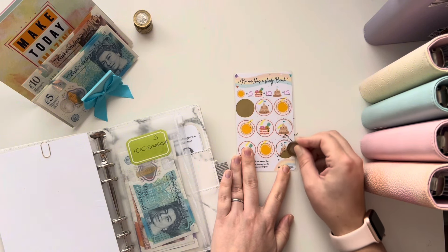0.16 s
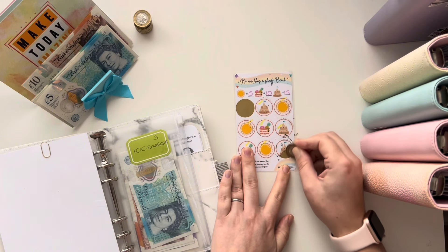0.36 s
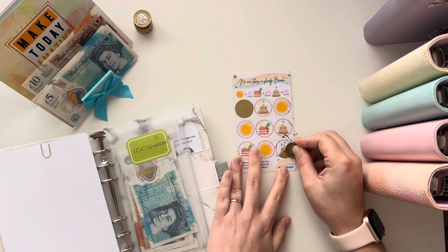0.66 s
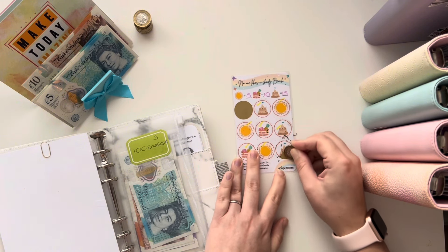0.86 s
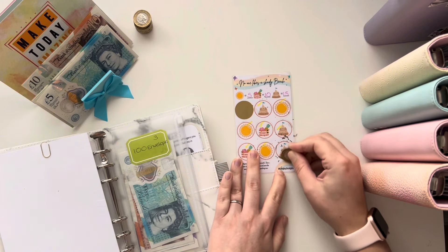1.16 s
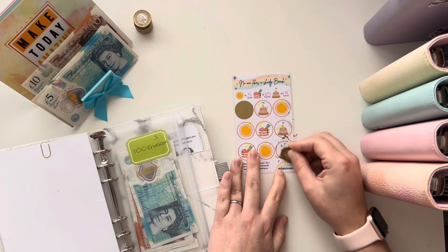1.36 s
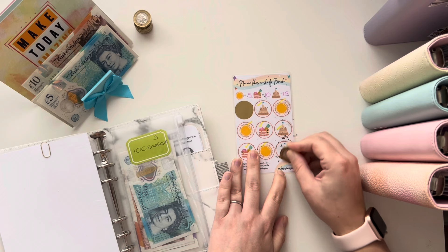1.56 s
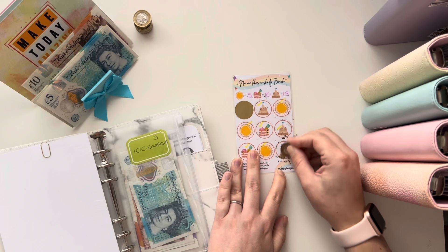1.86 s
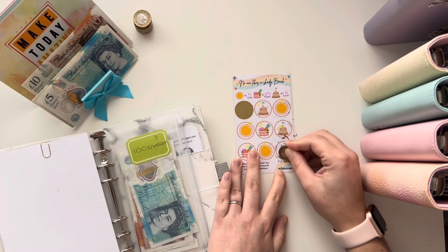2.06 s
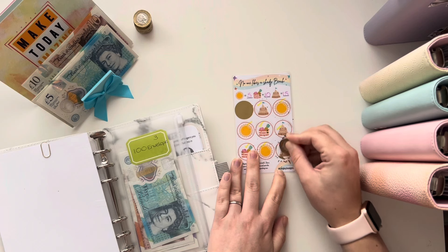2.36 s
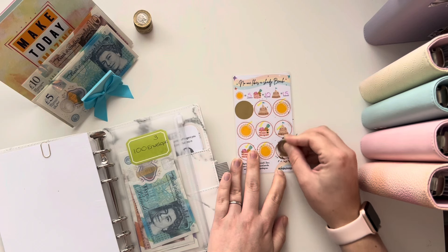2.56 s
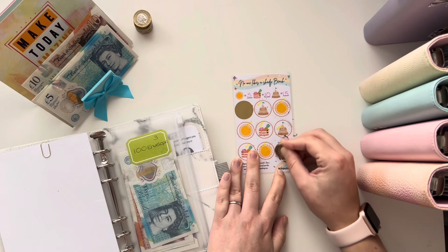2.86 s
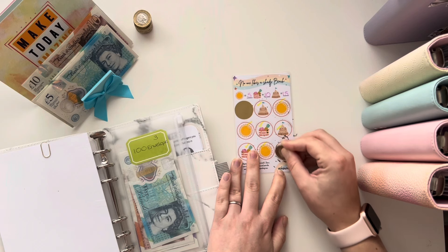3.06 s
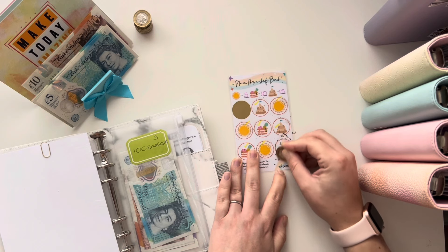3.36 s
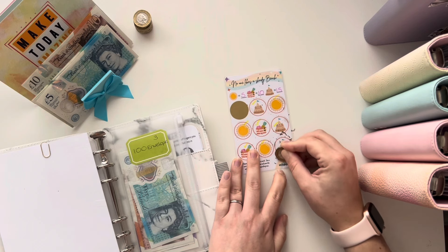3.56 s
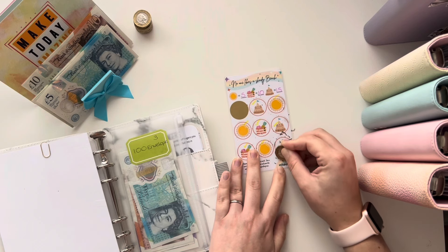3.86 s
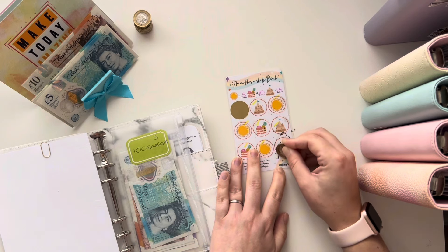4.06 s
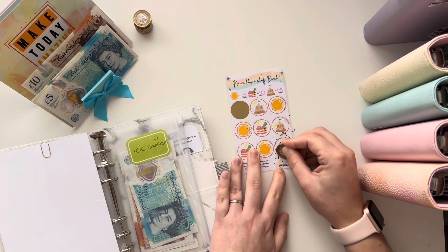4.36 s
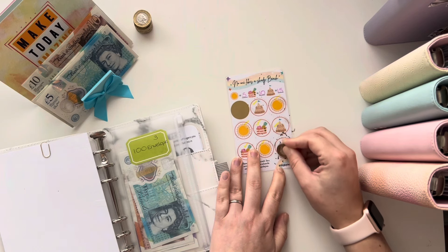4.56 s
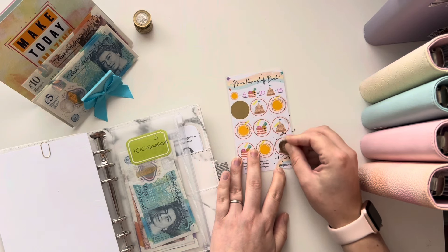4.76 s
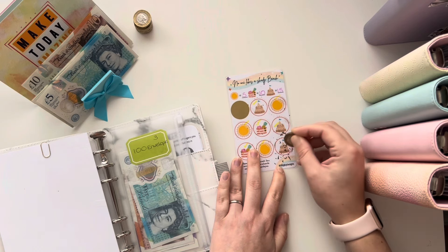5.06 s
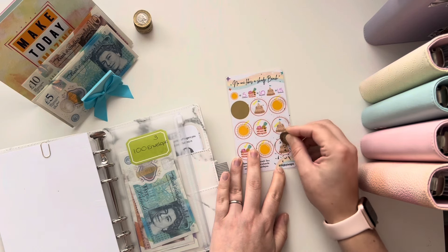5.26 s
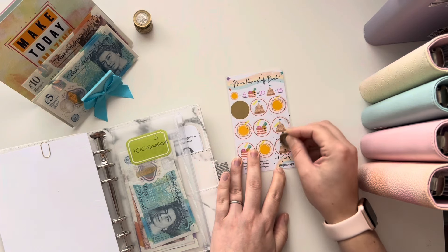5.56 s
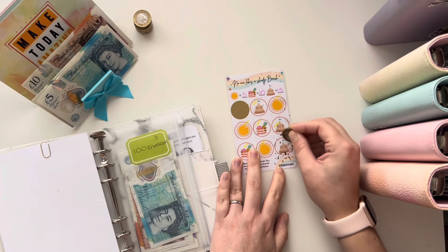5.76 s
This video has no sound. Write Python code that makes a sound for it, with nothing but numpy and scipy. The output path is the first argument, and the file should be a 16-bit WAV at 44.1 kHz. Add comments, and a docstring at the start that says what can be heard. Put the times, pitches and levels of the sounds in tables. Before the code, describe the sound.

A coin edge scratches a coated card on a hollow desk in quick, dry rubbing strokes, then uneven scrapes and two hard taps.

```python
"""A coin is rubbed in quick strokes over a coated paper card on a hollow desk, heard close by at two ports.
Modulated noise drives the desk modes and the grit; tap pulses and clicks mark each contact of the edge.
The strokes run dense for some three seconds, then grow uneven; near 3.7 s a wavering sine squeaks faintly.
After a lull near 5 s the two hardest taps end the scene.
Jolts and rumble ring slow modes; a small quiet room answers with decaying noise, over a steady hush."""
import sys
import numpy as np
from scipy import signal
from scipy.fft import rfft, irfft, next_fast_len
from scipy.io import wavfile
from scipy.ndimage import uniform_filter1d, map_coordinates

SR = 44100
rng = np.random.default_rng(int(sys.argv[2]) if len(sys.argv) > 2 else 0)


def ratio_of_db(decibels):
    """Turn decibels (scalar or array-like) into linear amplitude factors; 0 dB maps to 1."""
    return 10 ** (np.asarray(decibels, float) / 20)


def persist_wave(psi):
    """Save psi, clipped to +-1, as 16-bit WAV."""
    counts = np.round(np.clip(psi, -1, 1) * 32767).astype(np.int16)
    wavfile.write(sys.argv[1], SR, np.atleast_2d(counts).T)


N = 260983
SIDE = np.array([[.5], [-.5]])  # left, right share of a difference between the ports

# airborne sound reaches the two ports apart: (frequency [Hz], left lead [rad])
LEAD = [(2500, .8), (4000, 0), (6100, -.9), (7600, 0), (9500, -3.14), (11600, -6.28), (13400, -9.42),
        (15300, -12.57), (17000, -15)]
# tilt of the coin and shift of the hand:
# (time [s], top treble gain [dB], rim gain [dB], lowest desk mode gain [dB])
EDGE = [(0, -36, 10.5, -8), (.6, 9, 3, 0.5), (1, -9, 4.5, -6.5), (1.7, -4.5, 6, -0.5), (2.4, 3.5, 5.5, -5),
        (2.95, -3.5, -31, 3), (3.1, -7.5, -34, -2.5), (4.101, -1.5, -29.5, -0.5), (4.602, -8, -48.5, 2),
        (5.101, 12.5, 1, 3.5), (5.9, -1.5, 4.5, -36)]


def unit(x):
    """Scaled to rms 1."""
    return x / np.sqrt(np.mean(x ** 2) + 1e-20)


def along(points, hz):
    """(Hz, value) points interpolated on a log frequency axis."""
    f, v = np.transpose(points)
    return np.interp(np.log(hz + 1), np.log(f + 1), v)


def filtered(x, response):
    """x times a complex response of frequency."""
    m = next_fast_len(N + SR // 2)
    return irfft(rfft(x, m) * response(np.fft.rfftfreq(m, 1 / SR)), m)[..., :N]


def mode(f, hz, width_hz):
    """One causal resonance, gain 1 at its centre."""
    return 1j * f * width_hz / (hz * hz - f * f + 1j * f * width_hz)


def wobble(knots_per_s):
    """A smooth random curve."""
    knots = rng.standard_normal(int(N * knots_per_s / SR) + 4)
    return map_coordinates(knots, [np.arange(N) * knots_per_s / SR])


def patches(x, depth_db):
    """The colour of a noise drifts in random patches of frequency and time."""
    z = signal.stft(x, nperseg=256)[2]
    field = uniform_filter1d(rng.standard_normal(z.shape), size=5, axis=0)
    field = uniform_filter1d(field, size=14, axis=1)
    return signal.istft(z * ratio_of_db(depth_db * unit(field)), nperseg=256)[1][:N]


def strokes():
    """Force swells and fades through each stroke; the edge slips unevenly over the coating."""
    # (middle [s], half length [s], desk level [dB], grit over desk [dB], weight over desk [dB])
    rubs = [(0.039, 0.026, -47, -21.5, 0), (0.16, 0.033, -47.5, -24.5, 6), (0.248, 0.015, -55.5, -9.5, 5),
            (0.347, 0.026, -43.5, -19, 1.5), (0.444, .015, -44, -22, -4.5), (0.522, 0.025, -52.5, -26, 5),
            (0.646, 0.043, -63.5, -8.5, -2), (0.704, 0.044, -68.5, -14, 5), (0.82, .018, -47.5, -21, 6),
            (0.944, 0.02, -41, -18.5, -1.5), (1.079, 0.034, -45, -16, 8.5), (1.17, 0.0076, -39, -16, -3),
            (1.205, 0.018, -42.5, -14.5, -35), (1.309, 0.036, -46, -13, 8), (1.419, 0.022, -39, -13, -6),
            (1.531, 0.03, -44, -13, 4), (1.644, 0.023, -45.5, -11, -5), (1.745, 0.03, -42.5, -18, 5),
            (1.873, 0.021, -42, -14.5, -3.5), (1.982, 0.032, -45.5, -16, 5),
            (2.099, 0.022, -42.5, -14.5, -3), (2.22, 0.026, -43.5, -20, 4), (2.33, 0.016, -47.5, -17, 8),
            (2.425, 0.026, -42.5, -16.5, 1), (2.529, 0.028, -58, -12.5, 2), (2.614, 0.017, -62.5, -16, 12),
            (2.642, 0.013, -45, -10, 9), (2.743, 0.021, -51, -8.5, -18), (2.85, 0.041, -65.5, -2.5, 17.5),
            (2.949, 0.016, -52.5, -10.5, 3.5), (3.075, 0.031, -57, -8.5, 5.5),
            (3.149, 0.012, -43.5, -18.5, -30), (3.27, 0.033, -63, -11, 5), (3.369, 0.019, -46, -13.5, -7),
            (3.497, 0.021, -62, -10.5, 10), (3.595, 0.026, -67.5, -2, 0), (3.768, 0.086, -77.5, -17, 1),
            (3.901, 0.015, -68, -19.5, -10.5), (3.937, 0.011, -51.5, -25, 9), (4.103, 0.034, -72, -34, 3.5),
            (4.141, 0.013, -45, -27.5, 3.5), (4.164, 0.012, -43, -16.5, -3.5),
            (4.277, 0.022, -51.5, -27, 9), (4.365, 0.046, -59, -21.5, 2.5), (4.478, 0.022, -60.5, -23.5, 9),
            (4.5, 0.014, -56.5, -24, 8), (4.557, 0.012, -45.5, -21.5, 2), (4.69, 0.053, -63, -34, 9),
            (4.749, 0.034, -61.5, -5.5, 0), (4.819, 0.041, -69, -10, 12.5), (4.933, 0.028, -81, 2.5, -4),
            (5.261, 0.024, -87, -18, 32), (5.299, 0.026, -61.5, -11, 18.5), (5.445, 0.018, -83, 6.5, -3),
            (5.526, 0.018, -44.5, -43, -1), (5.567, 0.036, -64, -6, 18.5), (5.618, 0.031, -75, -5, 15),
            (5.804, 0.021, -49.5, -24, 5), (5.85, 0.026, -54.5, -11, 14)]
    end_drop_db, rise_power, fade_power = 8.5, 2.06, 1.75  # drop half a length from the middle
    t = np.arange(N) / SR
    light, heavy, grit = np.zeros((3, N))
    for s, half_s, db, grit_db, weight_db in rubs:
        u = (t - s) / half_s
        swell = ratio_of_db(db - end_drop_db * np.abs(u) ** np.where(u < 0, rise_power, fade_power))
        light += swell
        heavy += swell * ratio_of_db(weight_db)
        grit += swell * ratio_of_db(grit_db)

    chatter = wobble(70)  # stick and slip shakes desk and grit together
    rasp = wobble(300)  # fine scrapes inside each stroke
    grains = rng.standard_normal((2, N)) * ratio_of_db(3.54 * rng.standard_normal((2, N)))
    # crumbs of coating tear off, 700 a second on average
    crumbs = (rng.random(N) < 700 / SR) * rng.standard_normal(N)
    crumbs = crumbs * ratio_of_db(1 * rng.exponential(size=N))
    grains = grains + crumbs * ratio_of_db([[17], [13]])

    slips = patches(grains[0], depth_db=2) * ratio_of_db(1.35 * chatter + 1.0 * rasp)
    fizz = patches(grains[1], depth_db=3) * ratio_of_db(2.1 * chatter + 0.26 * rasp)
    slow = filtered(slips, lambda f: 1 / (1 + (f / 900) ** 6))  # weight drives only the lower modes
    thud = desk(heavy * slow + light * (slips - slow)) / np.std(desk(slips))
    return thud + air(grit * fizz) / np.std(air(fizz))


def taps():
    """Each contact pushes the desk and springs back, with a short noise click."""
    # coin edge strikes or catches:
    # (time [s], level before drive gain [dB], click over that [dB], push and rebound [ms])
    contacts = [(0.131, -28.5, -35, 1.9), (0.614, -29, -42, 1.28), (0.692, -39, -24, 1.54),
                (0.896, -37, -55, 1.7), (0.927, -46, -33, 0.77), (1.201, -18.5, -34, 1.32),
                (1.272, -26, -55, 1.06), (1.496, -40.5, -34, 1.4), (1.553, -20.5, -46, 1.2),
                (1.611, -26, -29.5, 0.74), (1.834, -47, -13, 1.3), (2.202, -28, -53, 2),
                (2.604, -33, -52, 1.9), (2.63, -25, -38, 0.96), (2.639, -19.5, -48, 0.99),
                (2.731, -21, -34, 0.54), (2.737, -24.5, -60, 0.36), (2.863, -21.5, -39, 1.25),
                (2.942, -25.5, -38.5, 0.42), (3.066, -12, -37, 1.14), (3.143, -17.5, -49.5, 1.19),
                (3.353, -37.5, -40, 1.2), (3.363, -25, -30.5, 1.31), (3.571, -42.5, -17, 2),
                (3.599, -32.5, -42, 1.96), (3.929, -39.5, -30, 0.75), (3.941, -39.5, -43, 2),
                (4.05, -26.5, -43.5, 1.1), (4.133, -27.5, -40, 0.96), (4.166, -31.5, -26, 0.78),
                (4.414, -39, -36, 0.55), (4.303, -18.5, -42.5, 1.03), (4.487, -19.5, -40, 1.04),
                (4.545, -34, -48, 1.2), (4.665, -22, -40, 0.93), (4.712, -33.5, -51, 2.3),
                (4.721, -31.5, -23.5, 0.83), (4.763, -44.5, -13.5, 2.8), (5.215, -39, -31, 2),
                (5.277, -28.5, -32, 1.1), (5.288, -42.5, -22.5, 1.9), (5.507, -7, -42, 1.63),
                (5.553, -20.5, -22, 1.27), (5.781, -5, -42, 1.7)]
    drive_db, jar_db = 16.5, 12.5
    click_rise_s, click_t60_s, click_tail_t60_s = .0004, .005, .033
    push, click = np.zeros(N + SR), np.zeros(N + SR)
    t = np.arange(SR // 40) / SR
    for s, db, click_db, ms in contacts:
        now = slice(round(s * SR), round(s * SR) + len(t))
        u = t / (ms / 1000)
        push[now] -= ratio_of_db(db + drive_db) * np.sin(2 * np.pi * u) * np.exp(-2.5 * u)
        # the hard edge jars the higher modes
        push[now] -= ratio_of_db(db + jar_db - 60 * t / 0.0013) * np.sin(2 * np.pi * 2100 * t)
        fall = 0.84 * ratio_of_db(-60 * t / click_t60_s) + 0.5 * ratio_of_db(-60 * t / click_tail_t60_s)
        envelope = fall * (1 - np.exp(-t / click_rise_s))
        click[now] += ratio_of_db(db + click_db + drive_db) * envelope * rng.standard_normal(len(t))
    # a short tap moves the lowest mode less; the coin stays pressed down, so the modes die sooner
    return desk(push[:N], low_db=-3, damping=1.45) + air(click[:N])


def desk(force, low_db=0, damping=1):
    """The desk top rings; neighbouring modes swing in opposite senses, and the bass is not radiated."""
    # modes at each port, before hand shift and damping:
    # (frequency [Hz], width [Hz], left level [dB], right level [dB], left lead [rad])
    modes = [(406.1, 15, 6, 8.5, -0.5), (548.5, 96, -7, -1.5, 3), (617.8, 50.7, 1.5, -26.5, 1.49),
             (820.4, 100, -5.5, -4.5, -1.07), (1087, 22.2, -2.5, -2, 0.3), (1224, 38, 0, -10.5, 1.7),
             (1352, 41, -1, -2, 2), (1610, 52, -2.5, -4, 0.86), (2057, 34, -9, -10, 1.3),
             (2145, 107, -8.5, -15.5, -0.03), (2382, 250, -15.5, -27, -1.5), (3216, 82, -22, -67, 8)]
    card_hz = 4020  # the card cushions the desk above this
    shift, shifts_per_s = .018, 10  # the pressing hand detunes the modes by this share either way
    s, _, _, palm_db = np.transpose(EDGE)
    # the resting hand damps the lowest mode
    low = filtered(force, lambda f: 1 / (1 + (f / 490) ** 8))
    held = force + low * (ratio_of_db(np.interp(np.arange(N) / SR, s, palm_db) + low_db) - 1)

    def ring(x, tune):
        """The modes driven by x, all retuned by one factor."""
        def response(f):
            total = 0
            for k, (hz, width_hz, left_db, right_db, lead) in enumerate(modes):
                port = ratio_of_db([[left_db], [right_db]]) * np.exp(1j * SIDE * lead)
                total = total + (-1) ** k * port * mode(f, hz * tune, width_hz * damping) / damping
            return (f / (f - 210j)) ** 4 / (1 + 1j * f / card_hz) ** 2 * total
        return filtered(x, response)

    press = .5 + .5 * np.tanh(wobble(shifts_per_s))
    return ring(held * press, 1 + shift) + ring(held * (1 - press), 1 - shift)


def air(force):
    """The scraped coating heard straight through the air; its top and the rim follow the coin's tilt."""
    # grit of the coating: (frequency [Hz], relative spectral level [dB])
    coating = [(1200, -2), (2500, -5), (4000, -6), (5300, -13.5), (7500, -16), (10000, -13), (12500, -22),
               (15700, -11.5), (16100, -22), (16500, -80.5)]
    # coin rim, damped by the fingers: (frequency [Hz], width [Hz], level before tilt [dB])
    rim_modes = [(3950, 430, -12.5), (6130, 560, 2), (6900, 47, -3), (7310, 640, -2.5)]
    s, top_db, rim_db, _ = np.transpose(EDGE)
    t = np.arange(N) / SR
    top = filtered(force, lambda f: 1 / (1 + (8500 / (f + 1)) ** 8))
    rim = filtered(force, lambda f: sum(ratio_of_db(db) * mode(f, hz, w) for hz, w, db in rim_modes))
    tilted = force + top * (ratio_of_db(np.interp(t, s, top_db)) - 1) + rim * ratio_of_db(np.interp(t, s, rim_db))

    def to_ports(f):
        return ratio_of_db(along(coating, f) + 2.4 * SIDE) * np.exp(1j * SIDE * along(LEAD, f))
    return filtered(tilted, to_ports)


def squeak():
    """A thin, faint whistle: a sine unsteady in pitch and level."""
    # centre of the wavering: (time [s], frequency [Hz], level [dB])
    whistle = [(3.68, 4070, -100), (3.69, 4090, -87), (3.77, 4020, -93), (3.87, 4060, -95.5),
               (3.9, 3980, -110)]
    s, hz, db = np.transpose(whistle)
    t = np.arange(N) / SR
    pitch_hz = np.interp(t, s, hz) + 90 * wobble(230)
    level_db = np.interp(t, s, db, -150, -150) + 3.9 * wobble(76)
    return ratio_of_db(level_db) * np.sin(2 * np.pi * np.cumsum(pitch_hz) / SR)


def bass():
    """Each jolt sets the desk frame ringing; far rumble of the building fills the lowest room modes."""
    # slow modes of the desk frame: (frequency [Hz], width [Hz], relative level [dB])
    frame = [(120.25, 5.6, -4.5), (137, 6.9, -4), (174, 22, -12), (239.4, 17, -18.5)]
    # slow modes of the room: (frequency [Hz], width [Hz], relative level [dB])
    boom = [(52, 12, 0.17), (68.7, 0.87, -0.67)]
    # the hand's weight jolts the frame: (time [s], peak level before port balance [dB])
    jolts = [(0.049, -50), (0.139, -46), (0.339, -49), (0.62, -48), (0.7, -55), (0.745, -57.5),
             (0.928, -56), (1.104, -41.5), (1.202, -50), (1.271, -51.5), (1.431, -59), (1.552, -40.5),
             (1.722, -56), (1.89, -54), (1.989, -49.5), (2.109, -54), (2.198, -43.5), (2.335, -51),
             (2.427, -46), (2.639, -37), (2.73, -45), (2.863, -45), (2.981, -50), (3.063, -45.5),
             (3.143, -43), (3.365, -45), (3.928, -52), (4.049, -49.5), (4.132, -47.5), (4.255, -54),
             (4.303, -48.5), (4.485, -45.5), (4.544, -56), (4.666, -44.5), (5.274, -61.5), (5.508, -45.5),
             (5.781, -49)]
    # building rumble before its waver: (time [s], level [dB])
    building = [(0.0, -59.5), (0.23, -59.5), (0.31, -73), (0.43, -56), (0.64, -65), (1.32, -60),
                (1.58, -64.5), (2.29, -63.5), (2.32, -66), (2.47, -51), (3.21, -60), (3.26, -67),
                (4.15, -64), (4.16, -56.5), (5.6, -75), (5.91, -58.5)]
    shudder_db, shudder_fall_db_per_s = -8, 124.5  # the arm trembles on after a jolt
    flesh_hz = 165  # the soft hand gives little above this
    t = np.arange(N) / SR
    shudder = sum((t > s) * ratio_of_db(db + shudder_db - shudder_fall_db_per_s * np.abs(t - s)) for s, db in jolts)
    rumble = ratio_of_db(np.interp(t, *np.transpose(building)) + 1 * wobble(5.5))

    def resonance(modes, f):
        """Sum of the modes."""
        return sum(ratio_of_db(db) * mode(f, hz, w) for hz, w, db in modes)

    def ring(modes, strength):
        """Noise of the given strength drives the modes."""
        def shape(f):
            return resonance(modes, f) * mode(f, 38, 120) ** 2 * (f / (f - 33j)) ** 5
        noise = rng.standard_normal(N)
        return filtered(noise * strength, shape) / np.std(filtered(noise, shape))

    def soft(f):
        """The frame under the soft hand."""
        return resonance(frame, f) / (1 + 1j * f / flesh_hz) ** 2 * (f / (f - 70j)) ** 2

    s, db = np.transpose(jolts)
    blows = np.bincount((s * SR).astype(int), ratio_of_db(db), N)
    jolted = filtered(blows, soft) / np.abs(filtered(signal.unit_impulse(N), soft)).max()
    mid = jolted + ring(frame, shudder) + ring(boom, rumble)
    opposed = ring(frame, shudder * ratio_of_db(-11.5)) * [[1], [-1]]
    return mid * ratio_of_db([[-.3], [.3]]) + opposed


def room(x, step=SR // 4):
    """Each frequency of the room's answer dies at its own speed; the hand moves, so the answer changes."""
    # decay: (frequency [Hz], t60 [s])
    decay = [(200, 0.6), (700, 0.18), (2000, 0.34), (8000, 0.094)]
    alike_hz = 497  # well below this both ports hear the same answer
    out = np.zeros((2, N + 2 * SR))
    for at in range(0, N, step):
        hz, t, z = signal.stft(rng.standard_normal((2, SR // 2)), SR, nperseg=256)
        tail = signal.istft(z * ratio_of_db(-60 * t / along(decay, hz)[:, None]), SR, nperseg=256)[1]
        wet = signal.fftconvolve(x[:, at:at + step], tail / np.linalg.norm(tail[0]), axes=1)
        out[:, at + 300:][:, :wet.shape[1]] += wet  # delayed by 300 samples
    both = out[:, :N].mean(0)
    return both + filtered(out[:, :N] - both, lambda f: f ** 2 / (f ** 2 + alike_hz ** 2))


def hush():
    """Steady room air and microphone noise, partly alike in both ports."""
    # (frequency [Hz], relative spectral level [dB])
    colour = [(90, -18.5), (150, -3.5), (420, -11), (640, -19.5), (1500, -24.5), (1900, -29), (4000, -32),
              (8000, -34.5), (11500, -36.5), (13200, -37.5), (15800, -45.5), (16300, -57)]
    alike, apart = filtered(rng.standard_normal((2, N)), lambda f: ratio_of_db(along(colour, f)))
    ports = filtered(alike, lambda f: np.exp(1j * SIDE * along(LEAD, f) * (f > 4000)))
    ports = ports + SIDE * 0.91 * apart
    return ratio_of_db(-76.5) * ports / np.std(alike)


def scene():
    """Coin, card and desk in the room; the room's answer is quiet, weakest near 1500 Hz."""
    coin = strokes() + taps() + squeak()
    answer_db = [(300, -8.0), (1500, -13.0), (4000, -7.0), (10000, -9.5)]  # (frequency [Hz], gain [dB])
    answer = filtered(room(coin), lambda f: ratio_of_db(along(answer_db, f)))
    return coin + answer + bass() + hush()


def band_limit(x):
    """A steep low-pass at the top of the band."""
    return signal.sosfilt(signal.butter(12, 16520, fs=SR, output="sos"), x)


def record(dry):
    """The finished mix as the two ports deliver it."""
    return band_limit(dry)


dry = scene()
out = record(dry)
persist_wave(out)
```